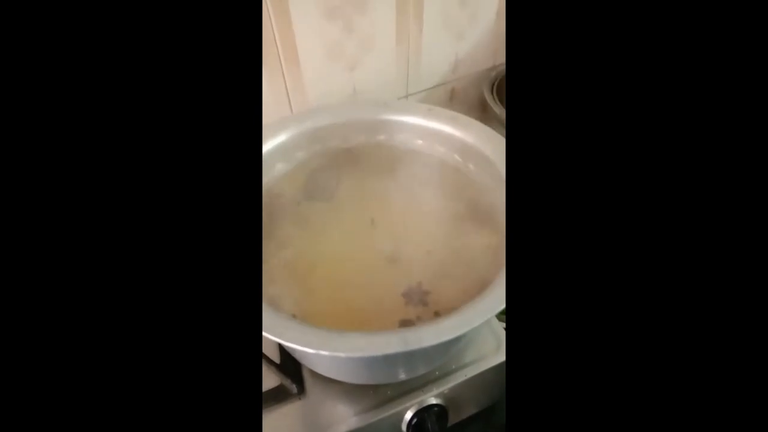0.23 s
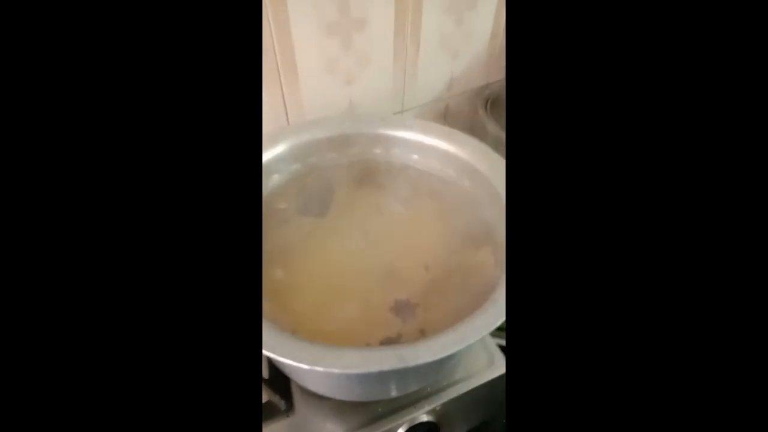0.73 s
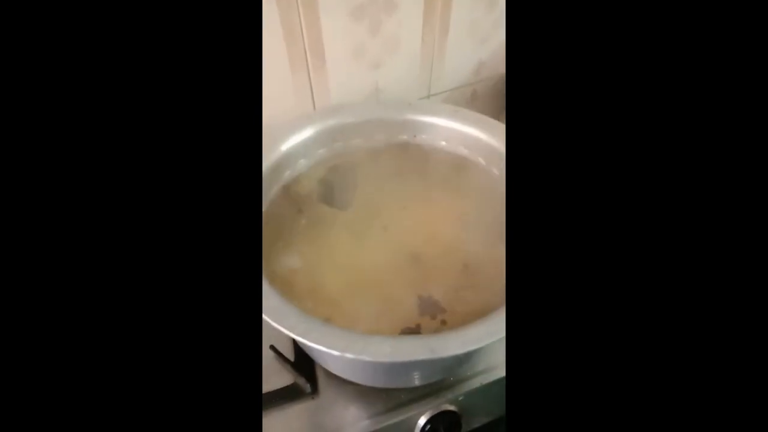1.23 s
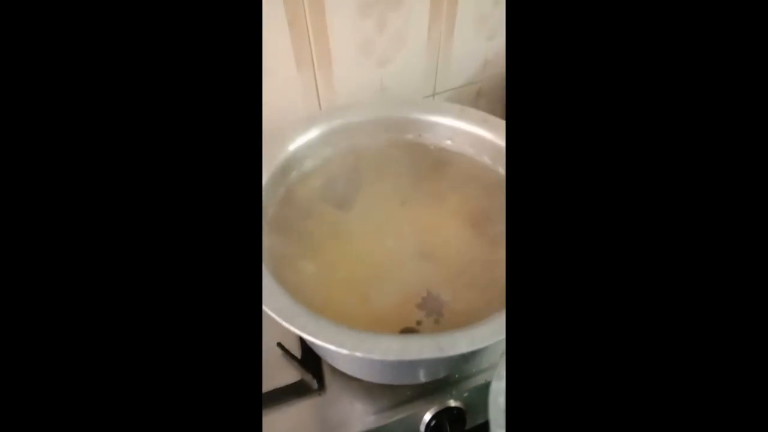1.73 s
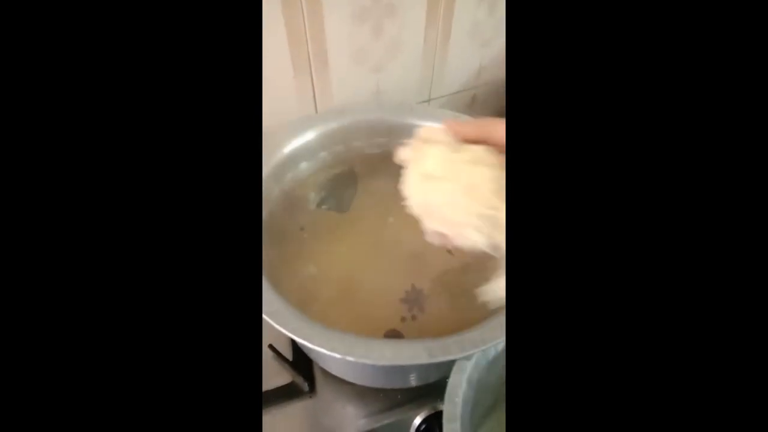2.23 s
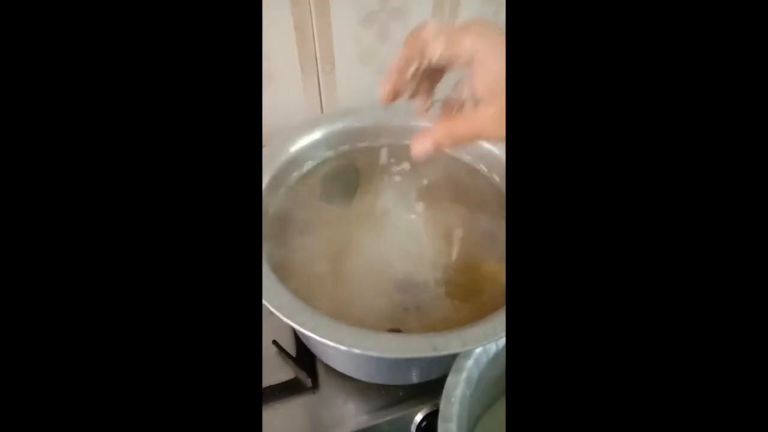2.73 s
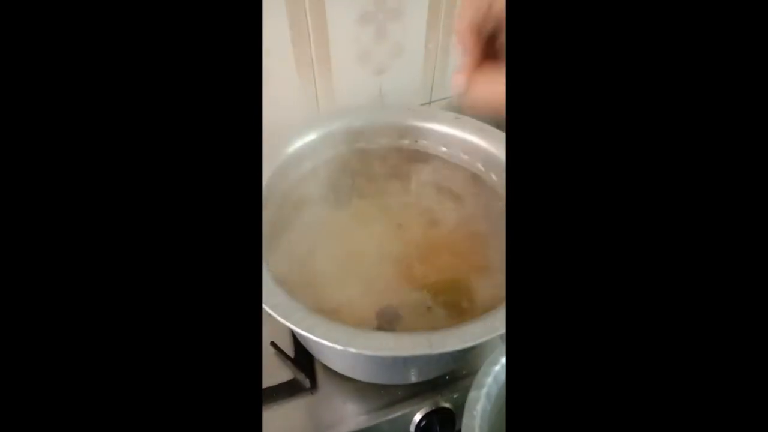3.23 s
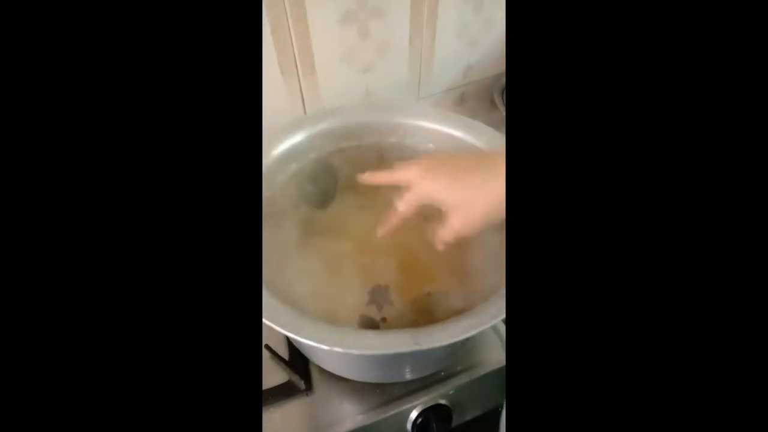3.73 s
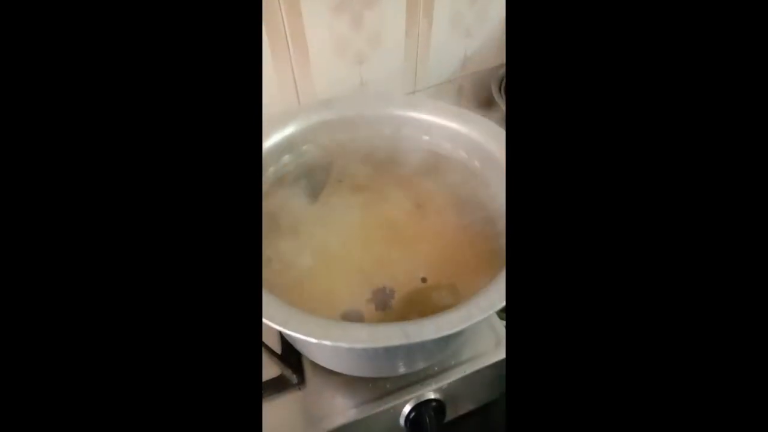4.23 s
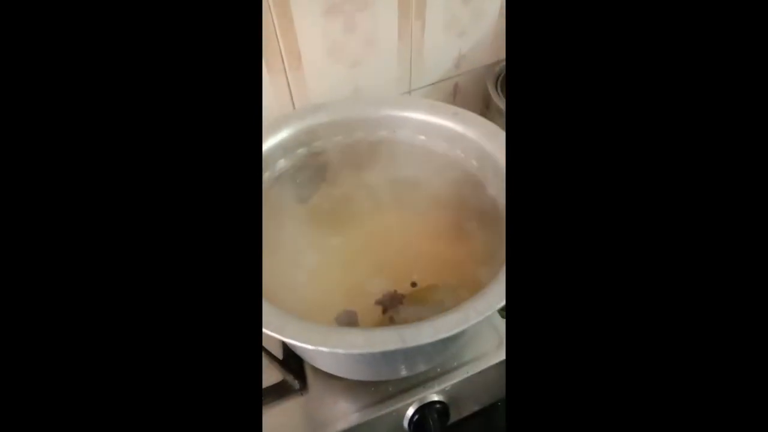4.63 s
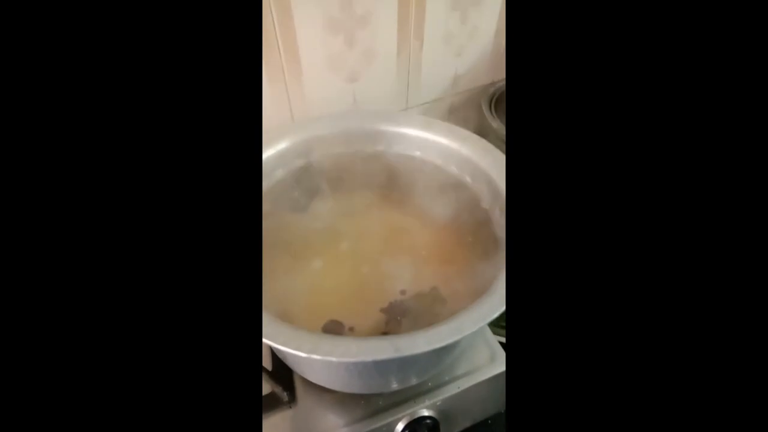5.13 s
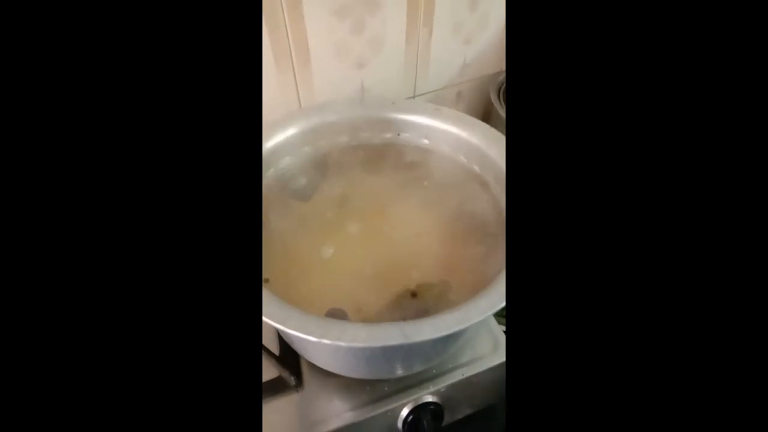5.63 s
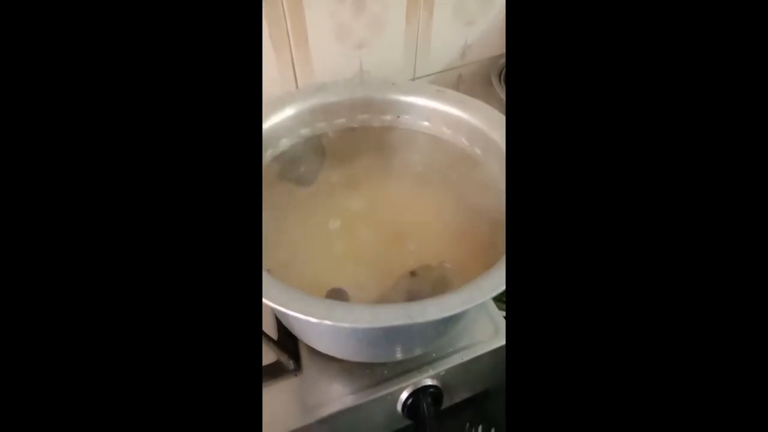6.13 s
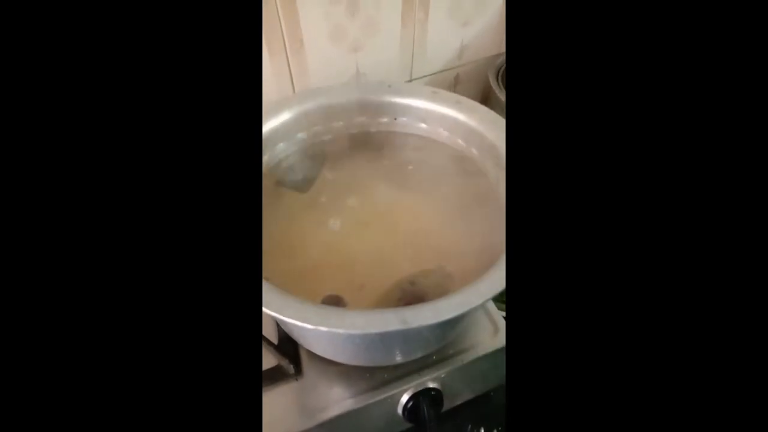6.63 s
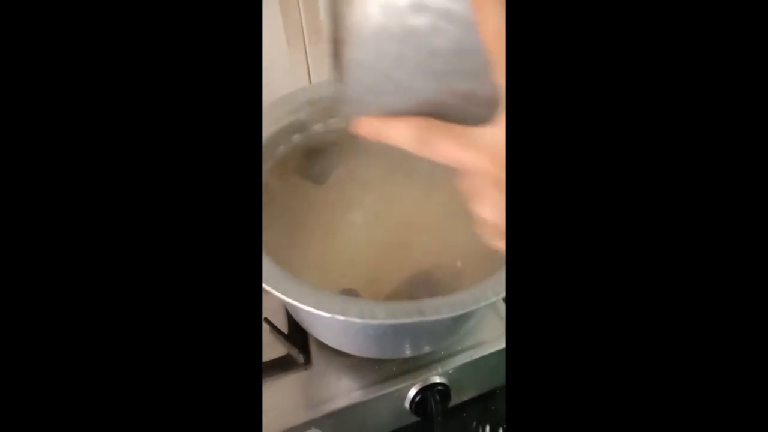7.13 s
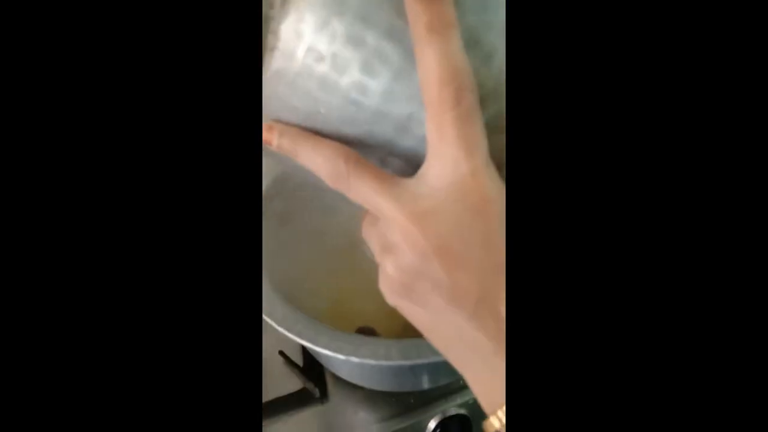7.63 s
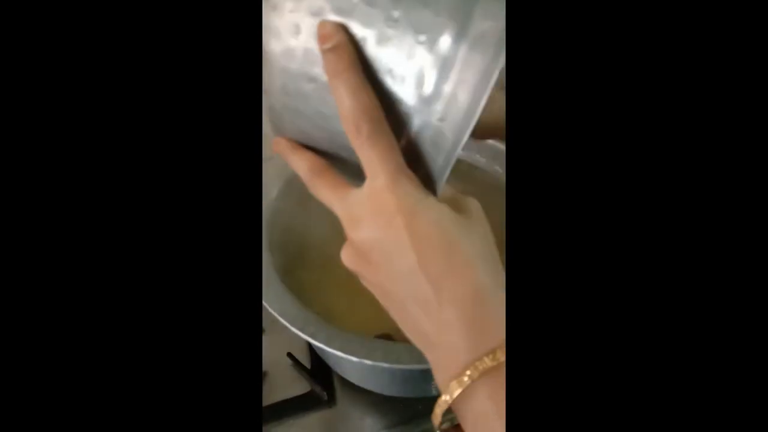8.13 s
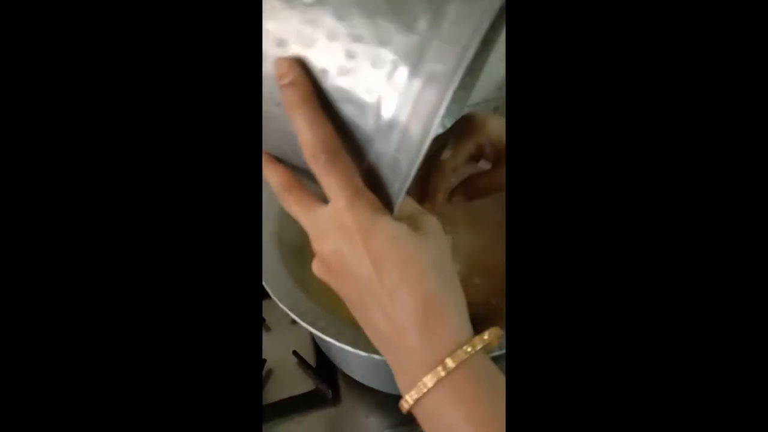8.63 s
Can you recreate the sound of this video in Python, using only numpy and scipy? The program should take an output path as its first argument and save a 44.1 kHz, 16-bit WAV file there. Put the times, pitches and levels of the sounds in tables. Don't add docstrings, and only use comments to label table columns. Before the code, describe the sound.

A steady gas hiss and soft simmering run throughout. Wet grains slosh, drip and tick at the start, then a heavy counter thud and a bright metal bowl clank ring out around two seconds. A cupboard door bangs, groans and knocks its frame around five. Finally a larger load of rice and water tumbles into the pot with plinking drips. A cricket chirps faintly; close phone microphone, echoing tiled kitchen.

```python
import sys
import numpy as np
from scipy import signal
from scipy.io import wavfile
from scipy.ndimage import uniform_filter1d

SR = 44100
rng = np.random.default_rng(int(sys.argv[2]) if len(sys.argv) > 2 else 0)


def natural_amplitude(level_db):
    exponent = np.asarray(level_db, float) / 20
    return 10 ** exponent


def materialize(psi):
    bounded = np.clip(np.atleast_2d(psi).T, -1, 1)
    quanta = np.round(bounded * 32767).astype(np.int16)
    wavfile.write(sys.argv[1], SR, quanta)


N = 391166


def evened(x):
    return x / np.sqrt(np.mean(x ** 2) + 1e-20)


def drift(size, length=N):
    noise = rng.standard_normal(length)
    return evened(uniform_filter1d(uniform_filter1d(noise, size=size), size=size))


def read(points, hz):
    f, value = np.transpose(points)
    return np.interp(np.log(hz + 1), np.log(f + 1), value)


def curves(rows):
    s, *columns = np.transpose(rows)
    return [np.interp(np.arange(N) / SR, s, c) for c in columns]


def add(mix, s, sound):
    part = mix[round(s * SR):][:len(sound)]
    part += sound[:len(part)]


def resonate(x, hz, width):
    turn = np.exp(2j * np.pi * np.cumsum(hz * np.ones(len(x))) / SR)
    r = np.exp(-np.pi * abs(width) / SR)
    smooth = signal.lfilter([1 - r], [1, -r], x / turn + 1e-18)
    return 2 * (turn * smooth).real


def colour(x, spectrum, tilt_db=0, patchy_db=0., size=1024):
    overlap = size * 3 // 4
    hz, t, z = signal.stft(x, SR, nperseg=size, noverlap=overlap)
    patches = uniform_filter1d(rng.standard_normal(z.shape), size=9, axis=0)
    patches = evened(uniform_filter1d(patches, size=12, axis=1))
    shape_db = read(spectrum, hz)[:, None] + patchy_db * patches
    if tilt_db:
        shape_db = shape_db + tilt_db(hz, t)
    return evened(signal.istft(z * natural_amplitude(shape_db), SR, nperseg=size, noverlap=overlap)[1][:N])


def sparse(per_s, spread_db):
    size_db = spread_db * np.minimum(rng.exponential(1, N), 5)
    return natural_amplitude(size_db) * (rng.random(N) < per_s / SR)


def surges(rows, rise_db_per_s, fall_db_per_s):
    s, hold, db = np.transpose(rows)[:3, :, None]
    t = np.arange(0, N + 64, 64) / SR
    rise_db = rise_db_per_s * np.maximum(s - t, 0)
    fall_db = fall_db_per_s * np.maximum(t - s - hold, 0)
    return natural_amplitude(db - rise_db - fall_db) ** 2


def with_surges(rest_db, power):
    surge = np.interp(np.arange(N), np.arange(power.shape[1]) * 64, power.sum(0))
    return np.sqrt(natural_amplitude(rest_db) ** 2 + surge)


# f/Hz, level/dB per Hz
FLAME_TONE = [(12, -54), (20, -13), (32, 10), (48, -52), (67, -6), (97, 5), (113, -3), (193, -21),
              (260, -26), (340, -27), (570, -120)]
# f/Hz, level/dB per Hz
SIMMER_TONE = [(82, -14), (140, -4.5), (291, -16), (357, -9.5), (422, -15), (661, -14.5), (876, -8.5),
               (1020, -6), (1270, 2), (1370, -3.5), (1580, -9.5), (2040, -13.5), (2850, -62), (3000, -90),
               (3900, -43), (6600, -120)]
# f/Hz, level/dB per Hz
JET_TONE = [(2300, -69), (2920, -41), (3300, -9), (4230, -6), (4750, -4), (5310, -14), (5750, -2.5),
            (6500, -3.5), (6800, 2), (7450, 7.5), (7900, -9), (9800, -3.5), (13500, -18.5), (15200, -4)]
# start t/s, hold t/s, level/dB
DRAUGHTS = [(0, 0.097, -46), (.33, 0.024, -61), (.55, 0.17, -42), (.89, 0.33, -44.5), (1.22, 0.39, -46),
            (1.84, 0.37, -40.5), (2.42, 0.011, -46.5), (3.03, 0.033, -41.5), (3.36, 0.019, -47),
            (3.57, 0.21, -44.5), (4.0, 0.31, -48), (4.56, 0.044, -44.5), (5.02, 0.14, -53),
            (8.85, 0.071, -51)]
# t/s, level/dB
CALM = [
    (0, -46),
    (4.4, -69),
    (4.7, -62.5),
    (8.87, -60),
]
# t/s, level/dB
BOIL = [(0, -55.5), (1.7, -49), (2.4, -49.5), (4.4, -47), (5.3, -47.5), (7, -46), (8.45, -43.5),
        (8.87, -47)]
# start t/s, hold t/s, level/dB
JOLTS = [
    (1.11, 0.023, -42.5),
    (2.13, 0.027, -41),
    (4.6, 0.02, -37),
    (7.35, 0.1, -46),
]
# f/Hz, width f/Hz, level/dB
WALLS = [(880, 60, -11), (1090, 60, -12), (1270, 100, 0), (1450, 60, -11), (1680, 70, -16)]
# f/Hz, width f/Hz, level/dB
DIPS = [(3550, 84, -8), (4240, 150, -46), (5130, 120, -4.5), (5900, 55, -5), (6800, 75, 4.5),
        (7490, 330, -2), (8900, 97, -12), (10140, 410, -2.5), (10830, 170, -2)]
# t/s, level/dB
HISS = [(0.0, -43), (1.19, -43.5), (1.85, -44), (2.47, -41.5), (2.81, -42.5), (3.04, -42.5), (3.38, -42.5),
        (5.16, -43.5), (5.29, -42), (6.79, -45), (7.31, -45), (7.51, -43), (8.5, -45.5), (8.87, -44)]


def stove():
    flame = with_surges(curves(CALM)[0], surges(DRAUGHTS, rise_db_per_s=146, fall_db_per_s=109))
    boil = with_surges(curves(BOIL)[0], surges(JOLTS, rise_db_per_s=270, fall_db_per_s=72))
    rumble = colour(rng.standard_normal(N), FLAME_TONE, size=4096) * flame
    water = rng.standard_normal(N)
    simmer = colour(water, SIMMER_TONE, patchy_db=2.5) * natural_amplitude(-6.0)

    def tiles(hz, t):
        return sum(db * np.exp(-((hz - f) / width) ** 2) for f, width, db in DIPS)[:, None]

    breath_db = curves(HISS)[0] - drift(6000) + 2.5
    jet = colour(rng.standard_normal(N), JET_TONE, tiles, patchy_db=2.0) * natural_amplitude(breath_db)
    walls = np.zeros(N)
    for hz, width, db in WALLS:
        wandering_hz = hz + 14 * drift(2500)
        note = evened(resonate(resonate(water, wandering_hz, width), wandering_hz, width))
        walls += natural_amplitude(db + 2.5 * drift(1800)) * note
    return rumble + boil * (simmer + natural_amplitude(-7.5) * walls) + jet


# f/Hz, level/dB per Hz
WET_TONE = [(180, -52), (300, -36), (432, -15.5), (518, -23), (852, -17), (1250, 3.5), (2900, -8.5),
            (7090, 5), (8230, -3.5), (15700, -11)]
# start t/s, hold t/s, level/dB, slosh depth level/dB, scatter fizz level/dB
HANDFULS = [(0.07, 0.16, -40.5, -1.5, -4.5), (0.476, 0.21, -46.5, 3, 1), (0.296, 0.38, -48.5, 14, -18),
            (0.818, 0.017, -49.5, -17, 3.5), (1.3, .03, -62, 13, -13), (2.265, 0.014, -53.5, 15, 11),
            (2.514, 0.099, -42.5, -2, -3), (4.273, 0.03, -47, -21, -7), (4.688, 0.24, -52, -4, -3),
            (5.388, 0.18, -45.5, -5, -2.5), (5.93, 0.056, -47.5, 10.5, -16), (6.364, 0.017, -52.5, 5, 4),
            (7.305, 0.12, -46, 7, -7), (7.383, 0.17, -41, -6, -7), (7.794, 0.13, -49, -12, -0.5),
            (8.175, .02, -45.5, -16, -12), (8.562, 0.15, -48, -16, -2.5)]
# level/dB, slosh depth level/dB, scatter fizz level/dB
SETTLED = (-57.5, 0., -5.5)


def rice():
    power = surges(HANDFULS, rise_db_per_s=228, fall_db_per_s=92)
    rest_db, *rest_tone = SETTLED
    rest = natural_amplitude(rest_db) ** 2
    tones = np.transpose(HANDFULS)[3:] @ power + rest * np.c_[rest_tone]
    depth_db, fizz_db = tones / (power.sum(0) + rest)
    s = np.arange(power.shape[1]) * 64 / SR

    ticks = sparse(2500., 4.2) * rng.choice([-1, 1], N)
    starts, size = sparse(500., 0.95), rng.integers(0, 12, N)
    t = np.arange(1500) / SR
    bubbles = np.zeros(N)
    for k, hz in enumerate(np.geomspace(650., 5000., num=12)):
        ring = np.sin(2 * np.pi * hz * t) * natural_amplitude(-60 * t * hz / 300.0) * hz
        bubbles += signal.oaconvolve(starts * (size == k), ring)[:N]
    grains = evened(ticks) + 1.27 * rng.standard_normal(N) + 0.53 * evened(bubbles)

    def tilt(hz, t):
        depth = np.outer(hz < 1500, np.interp(t, s, depth_db))
        return depth + np.outer(hz > 4600, np.interp(t, s, fizz_db))

    clumpy = colour(grains, WET_TONE, tilt, patchy_db=2.8, size=512)
    return clumpy * with_surges(rest_db, power) * natural_amplitude(1.0)


# start t/s, length t/s,
# level/dB, centre f/Hz
SWISHES = [(0.07, 0.15, -52, 1590), (0.095, 0.26, -49, 2750), (0.123, 0.1, -54, 3550),
           (0.288, 0.14, -51, 2120), (0.469, 0.38, -52, 1950), (.67, 0.11, -45, 850),
           (1.069, 0.11, -48, 1070), (5.358, 0.47, -54, 2270), (5.38, 0.23, -50, 4170),
           (5.482, 0.068, -46.5, 920), (5.812, 0.28, -50.5, 3760), (5.849, 0.26, -58, 2150),
           (6.998, 0.13, -46, 6100), (7.295, 0.17, -46, 1800), (7.36, 0.49, -50.5, 3250),
           (7.452, .18, -55, 1740), (4.6, 0.39, -44.5, 513), (5.079, 0.38, -47, 517),
           (7.621, 0.49, -51, 3530), (8.408, .17, -56.5, 3680), (8.545, 0.29, -64, 2320),
           (8.727, 0.12, -57, 3530), (2.949, 0.12, -63, 2390), (2.458, 0.25, -58, 2400),
           (6.552, 0.15, -61, 710), (6.678, 0.12, -59, 354), (7.525, 0.15, -58, 330),
           (7.763, 0.12, -58, 297), (7.3, 0.22, -56, 440), (0.085, 0.12, -55, 1280),
           (0.821, 0.22, -56, 1300), (1.085, 0.14, -54, 1300), (1.402, 0.14, -56, 1070),
           (5.858, 0.092, -52, 2170)]


def swishes():
    out = np.zeros(N)
    for s, length, db, hz in SWISHES:
        u = np.linspace(0, 1, round(length * SR))
        bubbly = evened(uniform_filter1d(rng.standard_normal(SR // 2), size=130))[:len(u)]
        froth = rng.standard_normal(len(u)) * natural_amplitude(3.2 * bubbly)
        sag, width = hz * (1 + 0.06 * (.5 - u)), 0.26 * hz
        band = resonate(resonate(froth, sag, width), sag, width)
        swell = np.minimum(u / 0.1, 1) * np.minimum((1 - u) / 0.7, 1)
        add(out, s, natural_amplitude(db) * evened(band) * swell)
    return out


# t/s, peak level/dB, f/Hz
DRIPS = [(.083, -27.5, 1620), (.209, -31, 2740), (.288, -25.5, 1970), (.362, -27, 1915), (.365, -35, 3590),
         (.418, -35, 850), (.51, -28.5, 1150), (.68, -29, 780), (.707, -32.5, 807), (.759, -40, 2890),
         (1.081, -31.5, 780), (1.08, -32.5, 1100), (1.251, -29, 1103), (1.882, -39.5, 2120),
         (4.246, -30.5, 1990), (5.307, -33.5, 1055), (6.69, -45, 170), (7.346, -35, 1790),
         (7.374, -31.5, 800), (7.404, -26, 850), (7.462, -25, 906), (7.519, -32.5, 713), (7.569, -26, 1710),
         (7.57, -34, 686), (7.621, -40, 160), (7.668, -24.5, 756), (7.725, -33, 2440), (7.789, -44, 298),
         (8.663, -35.5, 786)]
# t/s, peak level/dB, f/Hz, time to fall 60 dB
# t/s
PINGS = [(0.4, -34.5, 1380, 0.19), (.454, -33.5, 1150, .14), (0.61, -31.5, 1199, 0.26),
         (0.7, -27, 1120, 0.037), (0.67, -28, 1270, 0.074), (1.125, -33.5, 1300, 0.11),
         (1.22, -39, 1400, 0.043), (7.021, -32.5, 1260, 0.036), (7.437, -31, 2310, 0.044),
         (7.384, -31, 1720, .04), (7.419, -31, 1700, .04), (0.17, -35, 1574, .08), (0.2, -32, 3300, 0.057),
         (5.901, -54, 1100, 0.25), (7.019, -39, 1270, 0.19), (7.301, -26, 1230, 0.061),
         (7.429, -28, 1270, 0.064), (7.854, -32, 1270, 0.045), (.665, -48, 3180, 0.055),
         (1.359, -55, 400, 0.3), (2.69, -55, 420, 0.39), (7.3, -37.5, 475, 0.13), (7.375, -36, 880, 0.05),
         (7.465, -27, 780, 0.05), (7.515, -30, 930, 0.043), (8.8, -42, 1280, 0.1), (7.93, -46, 1400, 0.05),
         (3.015, -46, 2600, 0.032), (3, -38, 1500, 0.048), (0.65, -44, 2050, 0.1), (2.29, -38, 3700, 0.046),
         (1.135, -44, 750, 0.1), (1.253, -34, 1200, 0.04), (1.262, -40, 1400, 0.082),
         (6.415, -43, 2440, 0.12), (6.43, -37, 1800, 0.11), (5.195, -35, 2000, 0.05),
         (5.37, -44, 2200, 0.1), (7.727, -37, 1280, 0.066), (.947, -50, 2040, 0.25)]


def drips():
    out, t = np.zeros(N), np.arange(SR // 4) / SR
    pockets = [(s, db, hz, 0.06 * (hz / 1000) ** -0.16) for s, db, hz in DRIPS]
    for s, db, hz, t60 in pockets + list(PINGS):
        waver = 1 + 0.7 * np.minimum(t / 0.008, 1) * drift(150, len(t))
        tone = np.sin(2 * np.pi * hz * t * (1 + 0.49 * t))
        add(out, s, natural_amplitude(db - 60 * t / t60) * (1 - np.exp(-t / 0.0018)) * waver * tone)
    return out


def sprays(events, width):
    out, t = np.zeros(N), np.arange(SR // 4) / SR
    for s, db, hz, t60 in events:
        fade = natural_amplitude(-60 * t / t60) + 0.74 * np.exp(-t / 0.00091)
        spray = rng.standard_normal(len(t)) * fade * (1 - np.exp(-t / 0.00041))
        edges = np.clip([hz * (1 - width / 2), hz * (1 + width / 2)], 900, 17000)
        band = signal.sosfilt(signal.butter(3, edges, "band", fs=SR, output="sos"), spray)
        add(out, s, natural_amplitude(db) * band / abs(band).max())
    return out


# t/s, peak level/dB, centre f/Hz, time to fall
# 60 dB t/s
SPLASHES = [(.46, -26, 13000, 0.056), (.81, -38, 3220, 0.089), (.948, -37.5, 3730, 0.57),
            (1.195, -28.5, 2740, 0.055), (1.328, -37.5, 3020, 0.066), (1.433, -25, 4600, 0.092),
            (1.861, -29.5, 7200, 0.2), (1.965, -24, 4600, 0.046), (2.038, -31, 4530, 0.088),
            (2.225, -49, 12600, .12), (2.226, -18, 6600, 0.063), (2.225, -30, 4730, 0.089),
            (2.237, -27, 4170, 0.056), (2.243, -23, 5500, 0.035), (2.62, -36, 4970, .04),
            (2.647, -32.5, 2000, 0.05), (3.392, -38.5, 2290, 0.064), (4.239, -30, 2980, 0.08),
            (4.24, -22, 13000, 0.077), (4.241, -18, 7100, 0.029), (5.305, -29.5, 3970, 0.089),
            (5.409, -30.5, 4030, 0.88), (5.868, -52, 2620, 0.069), (6.414, -35, 2100, 0.27),
            (7.372, -31, 4530, 0.059), (7.302, -34, 1880, 0.057), (7.347, -41, 2300, .07),
            (7.378, -36, 2020, .06), (7.402, -33, 2100, .05), (7.465, -29, 1700, .07),
            (7.5, -42, 2000, .05), (7.52, -37, 1600, 0.064), (7.855, -38, 3450, 0.052),
            (.085, -37, 2220, 0.098), (.458, -30.5, 1700, 0.071), (.51, -36, 1690, .07),
            (8.83, -35, 4220, 0.27), (7.415, -30, 2450, 0.081), (7.466, -31, 2510, 0.025),
            (7.492, -27.5, 3240, 0.047), (7.678, -29, 5270, .025), (7.727, -36, 3900, 1),
            (8.561, -36, 7760, 0.036), (8.641, -38, 2570, 0.39)]


def splashes():
    return sprays(SPLASHES, width=0.38)


# t/s, peak level/dB, centre f/Hz, time to fall 60 dB
# t/s
SNAPS = [(.2, -25, 3480, 0.056), (.213, -34, 3500, 0.046), (.364, -21.5, 5100, 0.063),
         (.459, -19, 6000, 0.087), (2.223, -25, 7750, 0.16), (5.305, -45, 2500, 0.028),
         (1.252, -43, 2000, 0.036), (7.022, -38.5, 6700, .04), (4.24, -23.5, 3200, 0.11),
         (7.418, -26, 5000, 0.033), (7.515, -30, 3000, .03), (7.571, -29, 3000, .03),
         (7.727, -27, 3780, 0.025), (6.265, -39, 7800, 0.043), (2.237, -19.5, 7700, 0.033),
         (2.46, -28, 6940, 0.26), (5.048, -25.5, 3550, 0.068), (7.376, -35, 4500, .03),
         (7.405, -26, 4000, 0.04), (7.43, -31, 4000, .03), (7.47, -21, 4500, .03), (7.53, -29, 6000, .02),
         (7.597, -22, 5100, 0.062), (7.611, -19.5, 6240, 0.016), (7.669, -28, 3470, 0.071),
         (8.214, -20.5, 10500, .034), (8.215, -34, 3000, .02), (8.83, -29, 9250, 0.075)]


def snaps():
    return sprays(SNAPS, width=1.23)


# start t/s, length t/s, level/dB
CHIRPS = [(1.9, 0.14, -56), (2.52, 0.23, -55), (3.185, 0.27, -55.5), (3.897, 0.16, -54.5),
          (4.22, 0.21, -52), (4.76, 0.26, -49.5), (5.38, 0.21, -47.5), (5.977, 0.25, -48),
          (6.693, 0.26, -48), (7.01, 0.028, -54), (7.335, 0.22, -47.5), (7.965, 0.26, -48.5),
          (8.674, 0.31, -48.5)]


def cricket(wing_hz=4500., strokes_hz=35.5):
    out = np.zeros(N)
    for s, length, db in CHIRPS:
        t = np.arange(round(length * SR)) / SR
        swell = np.sin(np.pi * t / length) ** .12
        strokes = abs(np.sin(np.pi * strokes_hz * t)) ** 1.5 * swell
        uneven, start, bend = rng.standard_normal((20, 3))[(strokes_hz * t).astype(int)].T
        tone = np.sin(2 * np.pi * (wing_hz + 25 * bend) * t + start)
        add(out, s, natural_amplitude(db + 8.5 + uneven) * strokes * tone)
    return out


def blows(events, modes, fuzz, clatter_db, clatter_hz, clatter_t60):
    out, t = np.zeros(N), np.arange(SR // 2) / SR
    ring_size = 1.1 * np.linalg.norm(natural_amplitude(np.transpose(modes)[1]))
    for s, db in events:
        ring = np.zeros(len(t))
        for hz, mode_db, t60 in modes:
            shake = evened(uniform_filter1d(rng.standard_normal(len(t)), size=260))
            rattle = np.minimum(t / 0.008, 1) * shake
            tone = np.sin(2 * np.pi * (hz * t + rng.random()))
            ring += natural_amplitude(mode_db - 60 * t / t60) * (1 + fuzz * rattle) * tone
        clatter = evened(resonate(rng.standard_normal(len(t)), clatter_hz, clatter_hz))
        clatter = clatter * natural_amplitude(clatter_db - 60 * t / clatter_t60)
        add(out, s, natural_amplitude(db) * (ring / ring_size + clatter) * (1 - np.exp(-t / 0.00035)))
    return out


# t/s, peak level/dB
THUDS = [
    (1.964, -11.5),
    (1.98, -20),
    (2.015, -33),
    (2.038, -19.5),
]
# f/Hz, level/dB, time to fall 60 dB t/s
COUNTER = [(134, -14, 0.13), (197, -5, 0.12), (250, 2, 0.033), (328, 4.5, 0.019), (470, -34, 0.061),
           (567, -13.5, 0.08), (850, -24, 0.046), (1270, 1, 0.025), (3320, -24, 0.19), (4410, -21, 0.049)]


def counter_thuds():
    return blows(THUDS, COUNTER, 0.89, clatter_db=-20.0, clatter_hz=440.0, clatter_t60=0.09)


# t/s, peak level/dB
CLANKS = [
    (2.107, -8),
    (2.112, -7.5),
    (2.121, -18),
]
# f/Hz, level/dB, time to fall 60 dB t/s
BOWL = [(430, -3, 0.062), (739, -13.5, 0.093), (1086, -3.5, 0.05), (1246, 13, 0.06), (1300, 5.5, 0.12),
        (1230, -5, 0.088), (1367, -2.5, 0.088), (1150, -5, 0.08), (1700, -11, 0.078), (2200, -8, 0.025),
        (3240, -21, 0.04), (4020, -16, 0.08), (4600, -11, 0.022)]


def bowl_clanks():
    return blows(CLANKS, BOWL, 0.24, clatter_db=-34.0, clatter_hz=970.0, clatter_t60=0.1)


# t/s, peak level/dB
BANGS = [
    (4.507, -13),
    (4.510, -9.5),
    (4.531, -16.5),
]
# f/Hz, level/dB, time to fall 60 dB t/s
DOOR = [(92, -16, 0.5), (170, -20, 0.41), (287, -1.5, 0.038), (442.4, -4.5, 0.16), (513, 7, 0.057),
        (630, -11, 0.22), (776, 2.5, 0.045), (920, -6, 0.045), (1086, 5.5, 0.038), (1276, 2.5, 0.1),
        (1300, -5.5, 0.35), (1420, -19, 0.15), (1800, -9.5, 0.1), (1770, -6.5, 0.29), (2130, -13, 0.1),
        (2740, -9, 0.061), (3720, -13.5, 0.049), (4750, -10, 0.032), (5700, -6.5, 0.027)]


def door_bangs():
    return blows(BANGS, DOOR, 0.9, clatter_db=-27.5, clatter_hz=690.0, clatter_t60=0.28)


# t/s, level/dB, f/Hz
GROAN = [
    (4.816, -40, 420),
    (4.85, -39, 390),
    (4.885, -40, 310),
    (4.92, -41, 288),
    (4.97, -41, 281),
    (5.03, -33, 280),
]


def groan():
    out, start, end = np.zeros(N), GROAN[0][0], GROAN[-1][0]
    db, hz = (c[round(start * SR):round(end * SR)] for c in curves(GROAN))
    blur = evened(resonate(resonate(rng.standard_normal(len(hz)), hz, 60.0), hz, 60.0))
    tone = np.sin(2 * np.pi * np.cumsum(hz) / SR)
    add(out, start, natural_amplitude(db) * signal.windows.tukey(len(hz), .2) * (.6 * blur + .35 * tone))
    return out


# t/s, peak level/dB
KNOCKS = [
    (5.021, -12),
    (5.033, -14),
    (5.047, -9.5),
    (5.1, -20),
    (5.195, -20.5),
    (5.305, -23.5),
]
# f/Hz, level/dB, time to fall 60 dB t/s
FRAME = [(150.5, -11, 0.24), (281, 4, 0.045), (279.7, -3.5, 0.17), (434, 4.5, 0.064), (508, -7.5, 0.15),
         (800, -30, 0.075), (959, -5, 0.11), (1150, -18, 0.11), (1410, -5.5, 0.046), (1850, -7, 0.019),
         (3340, -15, 0.042)]


def frame_knocks():
    return blows(KNOCKS, FRAME, 0.68, clatter_db=-21.0, clatter_hz=890.0, clatter_t60=0.16)


# f/Hz, time to fall 60 dB t/s
KITCHEN = [(150, 0.67), (600, 0.81), (1500, 0.72), (4000, 0.57), (12000, 0.35)]


def kitchen(x):
    taps = np.zeros(SR)
    at = np.arange(200, SR - 20, 20)
    taps[at + rng.integers(0, 20, len(at))] = rng.choice([-1., 1.], len(at))
    hz, t, z = signal.stft(taps, SR, nperseg=256)
    fade = natural_amplitude(-60 * t / read(KITCHEN, hz)[:, None])
    tail = signal.istft(z * fade, SR, nperseg=256)[1]
    return signal.fftconvolve(x, tail / np.linalg.norm(tail))[:N]


def scene():
    near = drips() + swishes() + splashes() + snaps()
    knocks = counter_thuds() + bowl_clanks() + door_bangs() + frame_knocks()
    far, chirps = groan(), cricket()
    wet = kitchen(natural_amplitude(-8.5) * near + natural_amplitude(-7.5) * knocks + natural_amplitude(-1.0) * far + natural_amplitude(-8.) * chirps)
    return np.tile(near + knocks + far + chirps + wet + rice() + stove(), (2, 1))


# f/Hz, level/dB per Hz
STRAY_TONE = [(24, -29), (40, 4), (2160, -13), (2990, -25), (3930, 7), (6010, -26), (6640, -27),
              (8520, -23.5), (15500, -24)]


def microphone(dry):
    stray = natural_amplitude(-76) * colour(rng.standard_normal(N), STRAY_TONE, patchy_db=4.5, size=256)
    no_bass = signal.butter(6, 62., "high", fs=SR, output="sos")
    heard = signal.sosfilt(no_bass, dry) + np.array([stray, -stray])
    no_top = signal.firwin(1023, 15500, window=("kaiser", 9), fs=SR)
    return signal.oaconvolve(heard, no_top[None], "same", axes=1)


def top_cut(x):
    return signal.sosfilt(signal.butter(12, 16850, fs=SR, output="sos"), x)


def record(dry):
    heard = microphone(dry)
    return top_cut(heard)


dry = scene()
out = record(dry)
materialize(out)
```